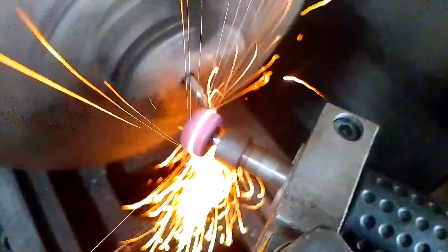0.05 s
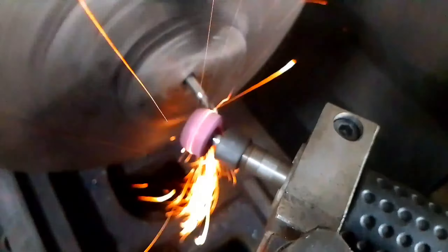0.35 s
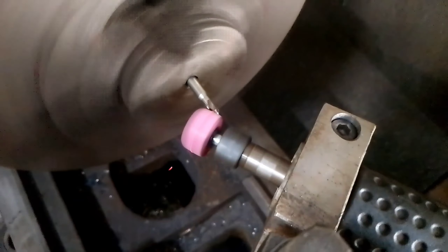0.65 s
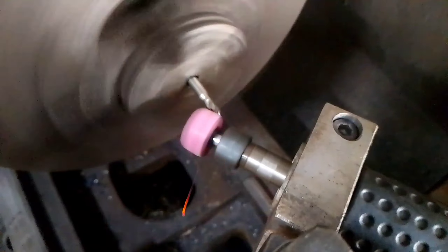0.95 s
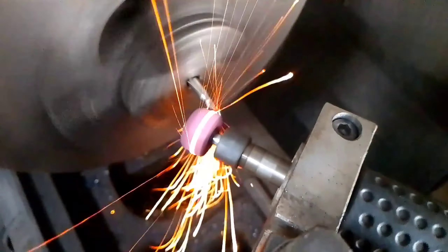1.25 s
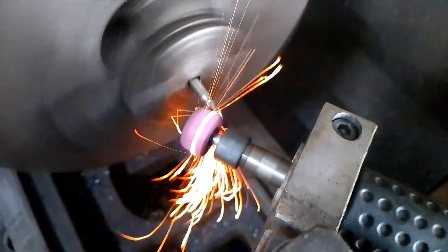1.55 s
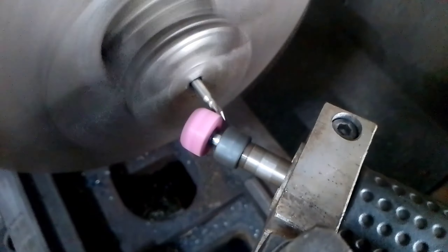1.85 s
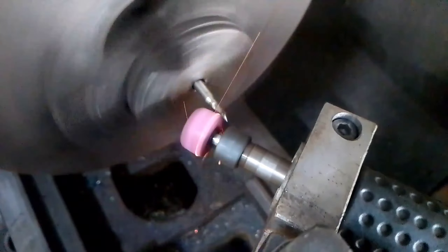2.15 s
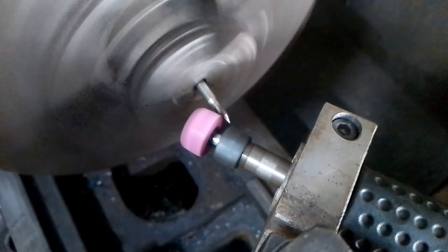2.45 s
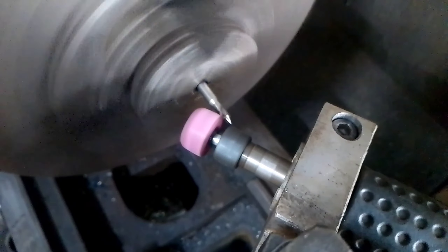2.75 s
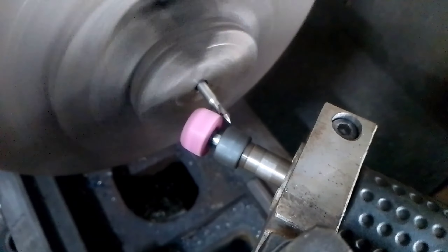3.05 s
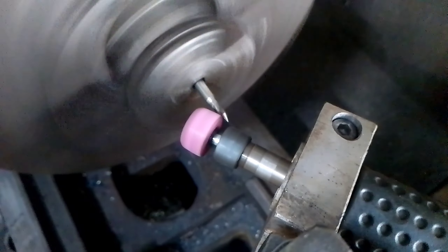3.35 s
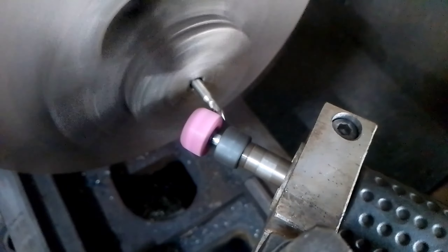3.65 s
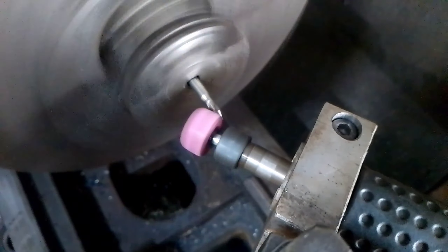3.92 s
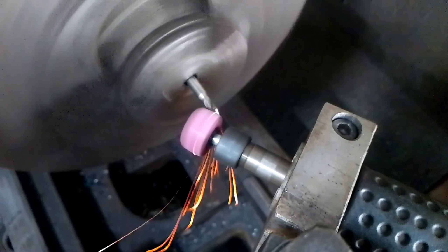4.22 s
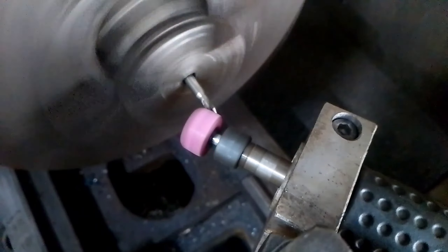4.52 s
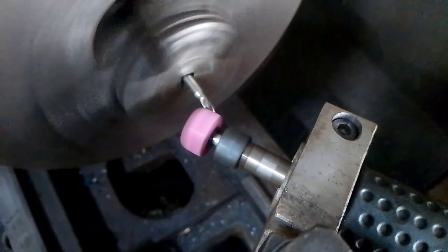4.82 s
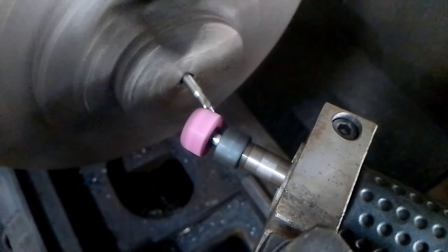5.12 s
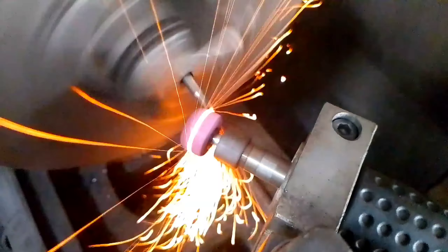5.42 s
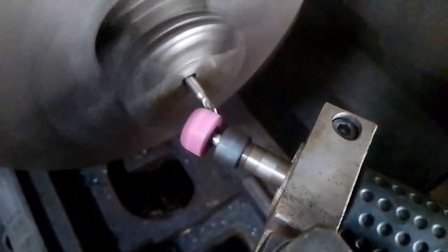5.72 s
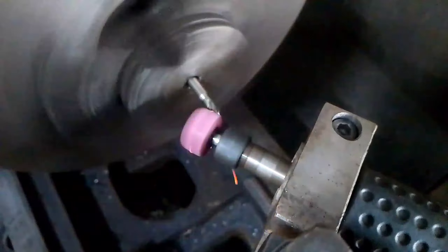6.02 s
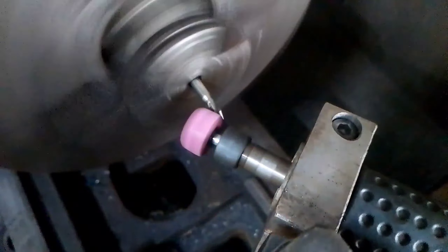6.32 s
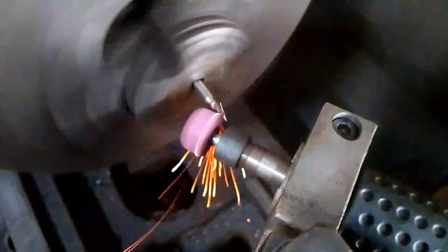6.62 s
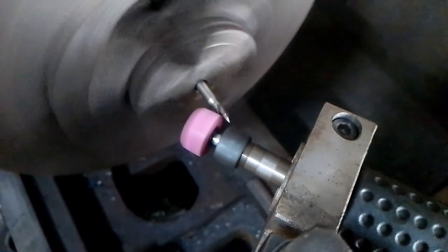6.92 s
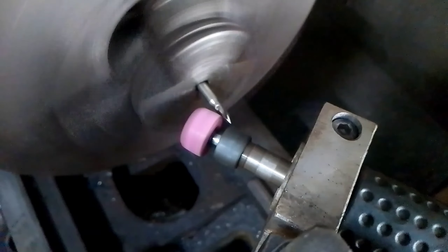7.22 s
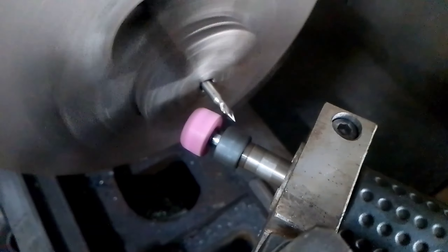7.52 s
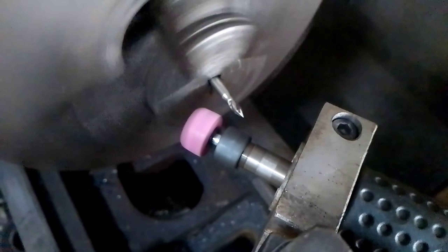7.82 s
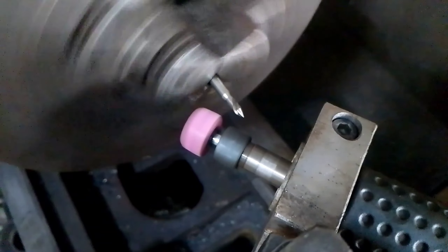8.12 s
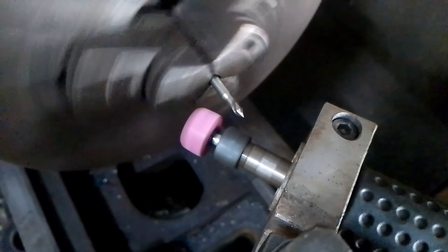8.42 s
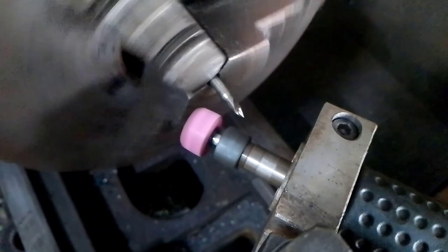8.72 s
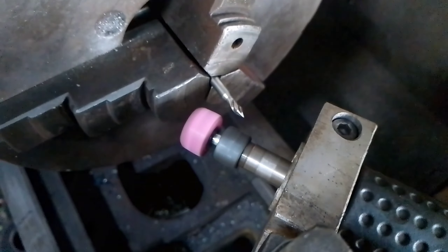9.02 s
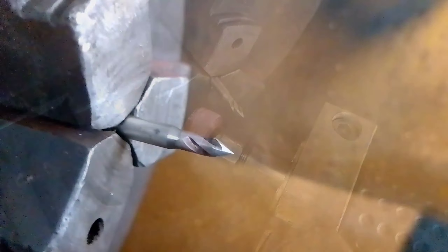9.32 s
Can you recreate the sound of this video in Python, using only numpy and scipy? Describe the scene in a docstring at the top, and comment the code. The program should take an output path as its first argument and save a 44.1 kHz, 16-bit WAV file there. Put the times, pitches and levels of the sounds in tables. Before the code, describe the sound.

Close, steady whine of a small grinder with brief grinding scrapes on steel; it winds down, leaving a quieter lathe running.

```python
"""A small electric die grinder, clamped on a lathe, touches its stone to a turning steel part, close by.
Unbalance hums, a worn ball bearing whines and rattles the housing, slots and commutator whistle,
the fan rushes, and shaft play buzzes the clamp. Each touch scratches and drags the speed down.
Switched off, the grinder coasts down; two dull knocks sound and the lathe's gears churn on."""
import sys
import numpy as np
from scipy import signal
from scipy.fft import rfft, irfft, next_fast_len
from scipy.io import wavfile

SR = 44100
rng = np.random.default_rng(int(sys.argv[2]) if len(sys.argv) > 2 else 0)


def to_wav(s):
    """Save 16-bit WAV."""
    ch = np.atleast_2d(s).T  # columns
    pcm = np.round(np.clip(ch, -1, 1) * 32767)  # PCM
    wavfile.write(sys.argv[1], SR, pcm.astype(np.int16))


N = 413216

# (frequency [Hz], relative density [dB])
LATHE_SPECTRUM = [(18, -55), (30, -21), (85, -7), (154, -28), (234, -4.5), (355, -3), (581, -12), (754, -6),
                  (1000, -9), (1440, -5), (3150, -13.5), (7430, -38), (9150, -35), (12800, -50),
                  (15000, -48)]
DRAUGHT_SPECTRUM = [(10, -3), (30, 3), (60, -3), (110, -3), (170, 0.5), (230, -4.5), (330, -16), (800, -41)]
FAN_SPECTRUM = [(250, -4), (700, -1.5), (1500, -1.5), (2600, 2.5), (4400, 1), (4750, -4), (6100, -10),
                (7600, -18.5), (8900, -17.5), (10600, -19.5), (12800, -30), (15000, -23)]
# resonances: (frequency [Hz], width [Hz], relative level [dB])
KNOCK_MODES = [(336, 170, 3), (585, 300, -6), (1300, 1200, -24)]
HOUSING_MODES = [(340, 220, -4.5), (917, 365, -1.5), (1358, 310, 3), (1715, 320, 2.5), (2160, 650, 0.5),
                 (2450, 470, -14), (3220, 880, -9), (3750, 430, -6), (3970, 285, 4), (4390, 380, -4.5),
                 (5530, 2600, -13), (6660, 470, -35), (8530, 1570, -15)]
CLAMP_MODES = [(1285, 140, -1.5), (2160, 210, -5), (4020, 200, -1), (4520, 180, -7)]
# steady level flutter near 43 Hz and slower random flicker: (rate [Hz], width [Hz], relative level [dB])
FLUTTER_BANDS = [(42.53, 2.1, 1), (35, 21, -7.5), (11, 13, -9.5)]
# dull blows: (time [s], level [dB], 60 dB decay [s])
KNOCKS = [(9.134, -28, .07), (9.164, -41, .04)]
# stone on steel: (time [s], length [s], pressure [0-1])
TOUCHES = [(-.134, 0.44, 0.99), (1.14, 0.45, .5), (2, 0.24, .16), (3.76, 0.098, 0.33), (4.252, 0.17, 0.16),
           (5.432, 0.26, 0.73), (5.911, .093, .54), (6.059, 0.15, .81), (6.503, 0.22, 0.73)]
# unloaded shaft: (time [s], speed [Hz])
FREE_SPEED = [(0, 441.2), (2.2, 446.2), (3.4, 454), (5.3, 456.6), (8.1, 458)]
# unbalance: (shaft multiple, relative level [dB])
HUM_PARTIALS = [(1, 0), (2, -5), (3, -9)]
# balls pass a flaw on the turning race, giving sidebands at shaft multiples:
# (ball-pass multiple, shaft multiple, relative level [dB])
WHINE_PARTIALS = [(1, 0, 0), (1, -1, -15), (1, 1, -9), (1, 2, -10), (2, -3, -10), (1, 4, -8)]
OVERTONE_PARTIALS = [(2, 1, 0), (2, -1, -5), (2, 2, -11), (2, 3, -18)]
# tones sliding through housing resonances:
# (shaft speed [Hz], hum gain [dB], bearing overtone gain [dB], slot gain [dB])
TONE_GAINS = [(150, -68, -34, -40), (290.4, -33, -41, -37), (335, -36, -28, -24), (385, -48, -37, -29),
              (408, -38, -32, -32), (429, -34.5, -36, -41), (435.5, -40, -29, -33.5),
              (440.6, -44, -26, -36.5), (446.1, -33.5, -26, -37.5), (455, -33.5, -29.5, -47),
              (457.8, -29.5, -29, -30.5)]


def undb(db):
    """Decibels to gain."""
    return np.exp(np.asarray(db) * (np.log(10) / 20))


def unit(x):
    """Scale to rms 1."""
    return x / np.sqrt(np.mean(x ** 2))


def walk(rate_hz):
    """Random drift, rms 1, with rate_hz new values a second."""
    t = np.arange(N) / SR
    steps = rng.standard_normal(N // 20)
    return unit(np.interp(t * rate_hz, np.arange(len(steps)), steps))


def colour(x, spectrum):
    """Filter by a spectrum table; rms 1."""
    hz, db = np.transpose(spectrum)
    size = next_fast_len(N, True)
    bins_hz = np.maximum(np.fft.rfftfreq(size, 1 / SR), 1)
    gain = undb(np.interp(np.log(bins_hz), np.log(hz), db))
    return unit(irfft(rfft(x, size) * gain, size)[:N])


def ring(x, modes):
    """Drive steep resonances, neighbours in opposite polarity; rms 1."""
    out = 0
    for k, (hz, width_hz, db) in enumerate(modes):
        section = np.concatenate(signal.iirpeak(hz, hz / width_hz, SR))
        out = out + (-1) ** k * undb(db) * signal.sosfilt([section, section], x)
    return unit(out)


def no_bass(x, hz):
    """High-pass: small bodies radiate little below their lowest mode."""
    return signal.sosfilt(signal.butter(6, hz, "highpass", fs=SR, output="sos"), x)


def hump(hz, centre_hz, width_hz):
    """Bell curve: 1 at the centre, half at one width away."""
    return 1 / (1 + ((hz - centre_hz) / width_hz) ** 2)


def grains(rate_hz, spread_db):
    """Random tiny impacts of uneven size."""
    hits = rng.random(N) < rate_hz / SR
    return hits * rng.standard_normal(N) * undb(spread_db * rng.standard_normal(N))


def tone(turns, multiple, slip_rad, waver_db):
    """Shaft partial with drifting phase and level; rms 1."""
    phase = 2 * np.pi * (multiple * turns + rng.random()) + slip_rad * walk(35)
    return np.sqrt(2) * np.sin(phase) * unit(undb(waver_db * walk(60)))


def lathe():
    """Gears churn steadily."""
    churn = rng.standard_normal(N) * undb(1.6 * walk(80))
    return undb(-41) * colour(churn, LATHE_SPECTRUM)


def knocks():
    """Short dull blows: decaying noise of a resonant body."""
    t = np.arange(N) / SR
    blows = sum(undb(db - 60 * np.maximum(t - at_s, 0) / t60_s) * (t >= at_s)
                for at_s, db, t60_s in KNOCKS)
    return no_bass(blows * ring(rng.standard_normal(N), KNOCK_MODES), hz=230)


def draught(speed_ratio):
    """Air buffets the microphone while the fan is fast."""
    gusts = speed_ratio ** 3 * undb(-44.5 + 1.7 * walk(5.1))
    return gusts * colour(rng.standard_normal(N), DRAUGHT_SPECTRUM)


def contact(rise_s, fall_s):
    """Stone pressure, lagged on rise and fall."""
    t = np.arange(N) / SR
    pressure = 0
    for at_s, length_s, push in TOUCHES:
        rise = 1 - np.exp(-np.clip(t - at_s, 0, length_s) / rise_s)
        fall = np.exp(-np.maximum(t - at_s - length_s, 0) / fall_s)
        pressure = pressure + push * rise * fall
    return pressure


def shaft_speed_hz(sag_hz=35.49, off_s=8.094, drag_s=.925, friction_hz_per_s=151):
    """Touches slow the rotor; after switch-off, air drag and friction brake it."""
    t = np.arange(N) / SR
    free_hz = np.interp(t, *np.transpose(FREE_SPEED))
    driven_hz = free_hz - sag_hz * contact(rise_s=.118, fall_s=.219)
    coast = np.exp(-np.maximum(t - off_s, 0) / drag_s)
    return np.maximum(driven_hz * coast - friction_hz_per_s * drag_s * (1 - coast), 1)


def grinding(pressure):
    """Grit scratches the steel in uneven bites."""
    grit = ring(grains(6000, spread_db=3), modes=[(2400, 3000, 0), (4200, 1500, -2)])
    bites = undb(4 * walk(200))
    return undb(-35) * pressure * unit(grit * bites)


def buzz(turns, shaft_hz, pressure):
    """Shaft play taps the clamp once a turn; louder under load, swelling on coast-down near 220 Hz."""
    taps = np.diff(np.floor(turns + .035 * walk(50)), prepend=0)
    level_db = -32.5 + 4.5 * pressure + 13 * hump(shaft_hz, centre_hz=220, width_hz=49)
    return undb(level_db) * ring(taps * undb(2.9 * walk(300)), CLAMP_MODES)


def level_flutter(pressure):
    """Gain with a steady flutter near 43 Hz, independent of shaft speed, and random flicker."""
    wobble = ring(rng.standard_normal(N), FLUTTER_BANDS)
    return undb((1.64 + .35 * pressure) * wobble + .5 * walk(300))


def rush(speed_ratio, pressure):
    """Fan air yields to bearing rattle as speed falls; a level flutter is laid over the noise."""
    flutter = level_flutter(pressure)
    turbulence = rng.standard_normal(N) + .43 * unit(grains(9000, spread_db=3))
    air = colour(turbulence, FAN_SPECTRUM) * undb(.74 * walk(9))
    rattle = ring(grains(2500 + 7000 * speed_ratio, spread_db=1), HOUSING_MODES)
    air_share = .25 + .54 * speed_ratio ** 3
    blend = np.sqrt(air_share) * air + np.sqrt(1 - air_share) * rattle
    return undb(-17.5) * no_bass(flutter * blend, hz=222.4)


def motor(turns, shaft_hz, pressure, ball_passes_per_turn=4.066):
    """Unbalance hums, the worn bearing whines, 12 slots and 24 commutator bars whistle."""
    hum = sum(undb(db) * tone(turns, k, slip_rad=.2 * k, waver_db=1.5) for k, db in HUM_PARTIALS)
    whine = sum(undb(db) * tone(turns, m * ball_passes_per_turn + k,
                                slip_rad=.3 + .15 * abs(k), waver_db=1.6 + .3 * abs(k))
                for m, k, db in WHINE_PARTIALS)
    overtones = sum(undb(db) * tone(turns, m * ball_passes_per_turn + k, slip_rad=.55, waver_db=2.4)
                    for m, k, db in OVERTONE_PARTIALS)
    slots = tone(turns, 12, slip_rad=.9, waver_db=2.5)
    bars = tone(turns, 24, slip_rad=.45, waver_db=2)
    at_hz, *gains_db = np.transpose(sorted(TONE_GAINS))
    hum_db, overtone_db, slot_db = (np.interp(shaft_hz, at_hz, db) for db in gains_db)
    whine_db = -23 + 21.5 * np.log2(shaft_hz / shaft_hz.max())
    squeak_db = 16 * hump(shaft_hz, centre_hz=130, width_hz=18)
    brushes = undb(-46 - 7 * pressure + squeak_db) * bars
    bearing = undb(whine_db) * whine + undb(overtone_db) * overtones
    return undb(hum_db - 6 * pressure) * hum + bearing + undb(slot_db) * slots + brushes


def grinder(shaft_hz, speed_ratio, pressure, fade_below_hz=202, fade_db_per_octave=13):
    """Motor, buzz and rush, fading together at low speed."""
    turns = np.cumsum(shaft_hz) / SR
    fade = undb(fade_db_per_octave * np.minimum(np.log2(shaft_hz / fade_below_hz), 0))
    rotor = motor(turns, shaft_hz, pressure) + buzz(turns, shaft_hz, pressure)
    return fade * (rotor + rush(speed_ratio, pressure))


def scene():
    """Mono mix; shaft speed and stone pressure drive the grinder."""
    shaft_hz = shaft_speed_hz()
    speed_ratio = shaft_hz / shaft_hz.max()
    pressure = contact(rise_s=.054, fall_s=.054)
    tool = grinder(shaft_hz, speed_ratio, pressure) + draught(speed_ratio) + grinding(pressure)
    return (tool + lathe() + knocks())[None]


def record(dry, ceiling=.8, cutoff_hz=15550):
    """Soft clip, then steep low-pass."""
    rounded = dry / (1 + (np.abs(dry) / ceiling) ** 6) ** (1 / 6)
    return signal.sosfilt(signal.ellip(12, .1, 80, cutoff_hz, fs=SR, output="sos"), rounded)


dry = scene()
out = record(dry)
to_wav(out)
```